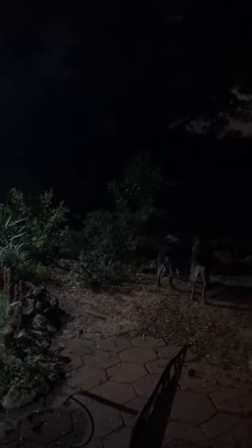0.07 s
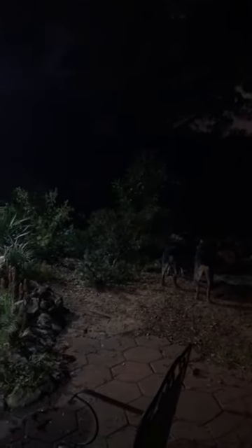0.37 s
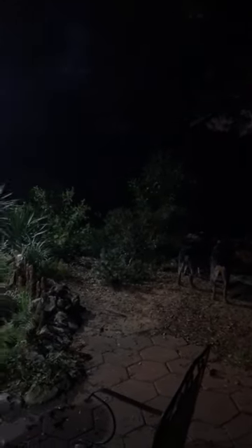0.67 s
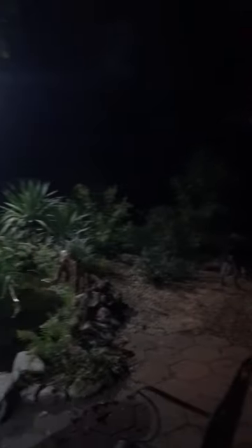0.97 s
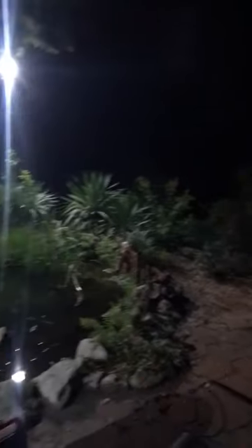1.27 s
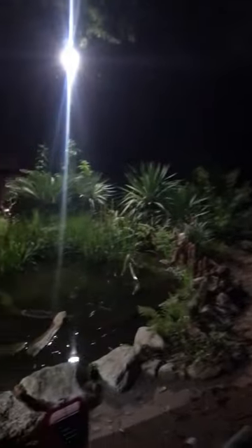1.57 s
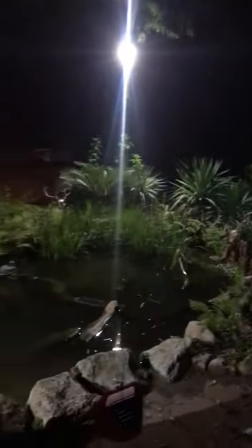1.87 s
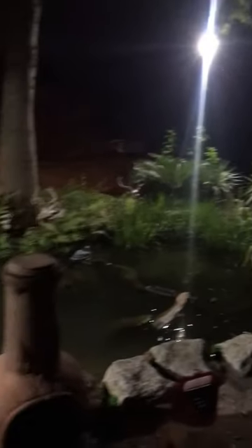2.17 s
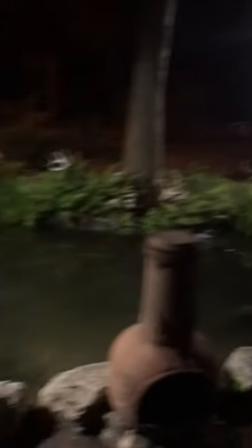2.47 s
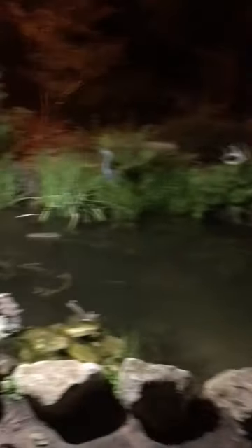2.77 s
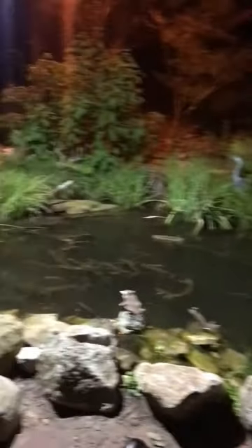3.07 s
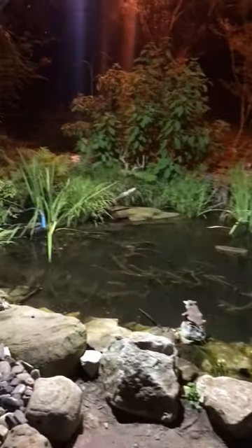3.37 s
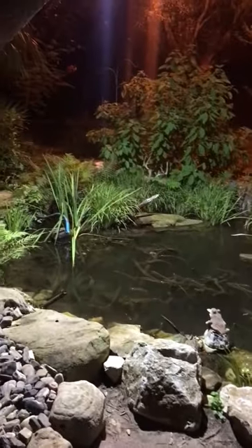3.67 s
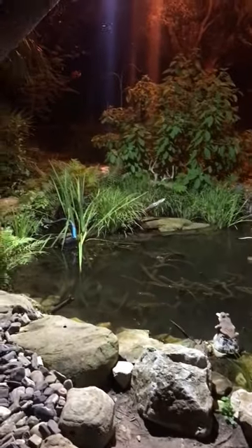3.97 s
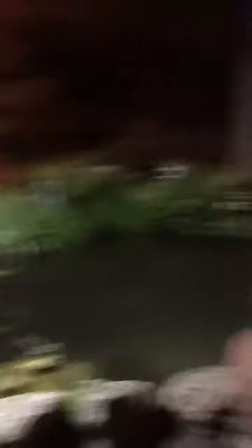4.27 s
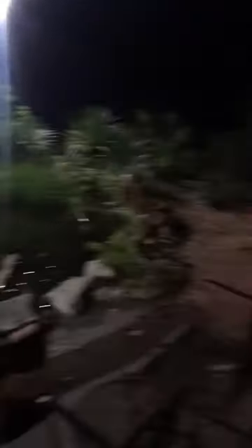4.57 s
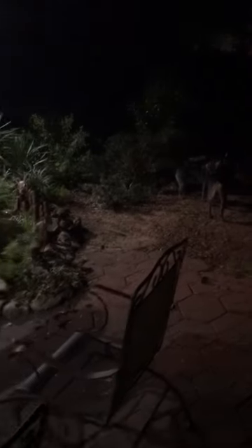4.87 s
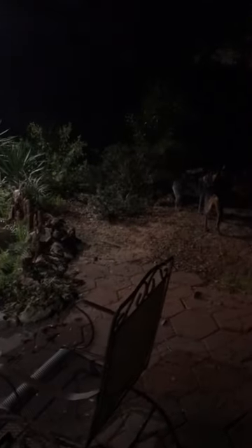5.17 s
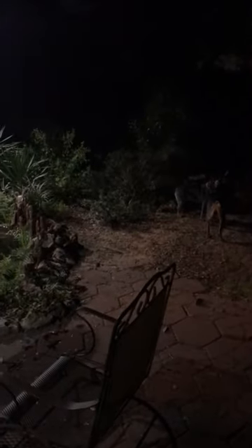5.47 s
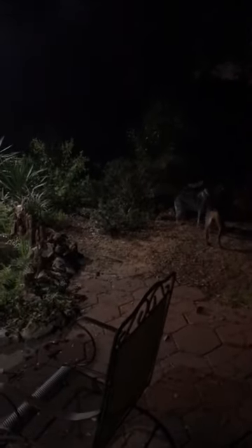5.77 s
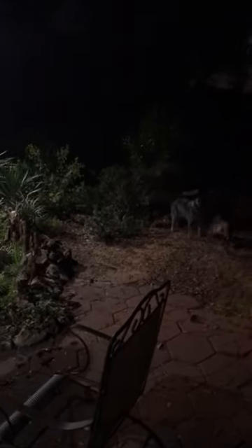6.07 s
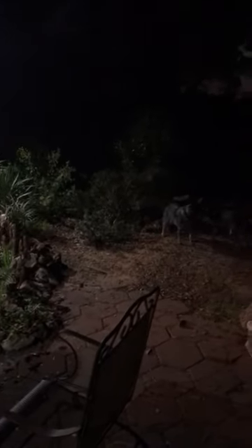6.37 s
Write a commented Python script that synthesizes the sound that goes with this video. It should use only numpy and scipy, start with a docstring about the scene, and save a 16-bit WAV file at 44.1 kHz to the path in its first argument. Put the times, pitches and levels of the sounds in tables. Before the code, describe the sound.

Dogs bark across a garden at night from the very start, about ten quick, shrill barks in the first two seconds. Each arches up and down in pitch and breaks into a rasp, with soft whines in between. From about 2.1 to 2.8 seconds one dog holds a short, almost pure howl that begins hoarse. Barks continue from 2.5 to 4 seconds, some cracking into a screech, with a weaker one at 4.4. A lull follows with faint dry rustles near 4.7 and 5 seconds. High yelps come between 5.3 and 6 seconds, then one sharp, yelping bark at 6.4. The house and fence return a faint echo. Throughout, a high insect buzz, a low pond pump hum, trickling water and night air sit very quietly behind the dogs. The hand-held microphone takes two soft, low bumps at about 2.6 and 4.3 seconds.

```python
"""Dogs in a back garden at night

Quick, shrill barks carry across the garden, each an arch of pitch that breaks into half-tones and rasp.
One dog holds a short pure howl, and the last barks turn into yelps. Fence and house answer faintly.
Behind them lie a katydid's high buzz, a pond pump's hum, trickling water and faint rustles.
The microphone is hand-held and gets bumped twice."""
import sys
import numpy as np
from scipy import signal
from scipy.fft import rfft, irfft, next_fast_len
from scipy.io import wavfile
from scipy.ndimage import uniform_filter1d, minimum_filter1d

SR = 44100
rng = np.random.default_rng(int(sys.argv[2]) if len(sys.argv) > 2 else 0)


def int16_out(signal):
    """Quantize to a 16-bit WAV file."""
    q = np.round(np.clip(np.atleast_2d(signal).T, -1, 1) * 32767)
    wavfile.write(sys.argv[1], SR, q.astype(np.int16))


N = 287532
TIME = np.arange(N) / SR


def barks_and_yelps(steady_jitter=0.0082, rough_jitter=0.035, shimmer=0.22, beat_hz=68):
    """Vocal folds swing near 1 kHz; driven hard, they double their period, then turn chaotic."""
    # rasp of the torn air stream: frequency_hz, gain_db
    rasp_colour = [(250, -38.5), (450, -70), (600, -1.5), (1150, 11.5), (1700, 11), (2300, 2), (2800, 10),
                   (3300, -14), (3900, -11.5), (4800, -45), (8000, -67.5)]
    # the mouth's upper resonances, reached when the folds snap shut hard: frequency_hz, gain_db
    shrill_colour = [(2800, -26.5), (4100, 1.5), (5000, -9.5), (6200, 1.5), (7800, -3.5), (9300, 2),
                     (11500, 0), (14000, -17.5), (16000, -35)]
    out = np.zeros(N)
    wobble, flutter = drift(360), drift(320)
    turbulence, hiss = noise(rasp_colour), noise(shrill_colour)
    slip = 2 * np.pi * np.cumsum(beat_hz * (1 + 0.35 * drift(20.56))) / SR
    for i, gate, pitch, tone_db, parts_db in [*bark_shapes(), *yelp_shapes()]:
        overtone_db, half_db, rasp_db, shrill_db = np.array(parts_db) - tone_db   # against the tone
        chaos = np.clip(from_db(rasp_db), 0, 1)
        pitch = uniform_filter1d(pitch, size=200, mode="nearest")
        # the rougher the voice, the more its cycles differ in length and strength
        jitter = (steady_jitter + rough_jitter * chaos) * wobble[i]
        strength = (1 + shimmer * chaos * flutter[i]) / np.hypot(1, shimmer * chaos)
        phase = 2 * np.pi * np.cumsum(pitch * (1 + jitter)) / SR
        # the two folds slip out of step and beat against each other
        beating = 0.8 * np.sqrt(chaos) * np.tanh(4 * chaos) * np.sin(phase + slip[i])
        tone = strength * (np.sin(phase) + beating + overtones(pitch, phase, overtone_db, half_db))
        # air is torn through the folds in puffs
        puffing = 1 + 0.1 * np.cos(phase / 2)
        puffs = from_db(rasp_db - 6) * turbulence[i] * puffing
        # uneven cycles blur the highest harmonics most
        ragged = phase + 0.1 * np.sqrt(chaos) * flutter[i]
        doubling = np.minimum(from_db(half_db - overtone_db), 1)
        highs = 0
        for k in np.arange(3, 12, 0.5):
            gain = from_db(at_hz(shrill_colour, k * pitch)) * (doubling if k % 1 else 1)
            highs += gain * np.sin(k * ragged)
        # they dissolve into hiss where the rasp outweighs the overtone
        airy = np.clip(0.03 + 1 / (1 + from_db(overtone_db - rasp_db + 3) ** 2), 0, 1)
        edge = np.sqrt(1 - airy) * rms_one(highs) + np.sqrt(airy) * hiss[i] * puffing
        out[i] += gate * from_db(tone_db) * (tone + puffs + from_db(shrill_db - 6) * edge)
    return out


def overtones(pitch, phase, overtone_db, half_db):
    """Harmonics of the folds, and half-tones between them as strong and weak cycles alternate."""
    # resonances of throat and open mouth: frequency_hz, gain_db
    throat = [(300, -40), (460, -32.5), (570, -5.5), (1100, 3.5), (1900, -2.5), (2800, -6), (3300, -6.5),
              (3900, -51), (4800, -46.5), (8000, -78.5)]
    out = from_db(overtone_db) * np.sin(2 * phase)
    for k in range(3, 7):
        colour_db = at_hz(throat, k * pitch) - 1 - 11 * np.log2(k / 2)
        out += from_db(overtone_db + colour_db) * np.sin(k * phase)
    for k in np.arange(5) + 0.5:
        colour_db = at_hz(throat, k * pitch) + 1 - abs(np.log2(k / 1.5))
        out += from_db(half_db + colour_db) * np.sin(k * phase)
    return out


def bark_shapes(break_s=0.0035, closing_s=0.023, sag_hz_per_s=650, fade_db_per_s=163.5, fall_ratio=0.455):
    """Each bark rises, stays harsh a moment, breaks into a clear note and falls as the mouth closes."""
    # barks: start_s, rise_s, harsh_s, clear_s, fall_s, first_hz, top_hz, clear_hz, harsh_db, clear_db,
    # harsh_overtone_db, clear_overtone_db, half_db, rasp_db, shrill_db, roughness_lost_db
    barks = [(-0.06, 0.029, 0.034, 0.018, 0.25, 860.0, 1262.0, 1152, -13, -11.5, -24, -36.0, -40.5, -20.5, -31, 10.5),
             (0.127, 0.034, 0.045, 0.055, 0.12, 980, 1158, 1083, -12.5, -6, -12.5, -22, -17, -18.0, -29, 6.5),
             (0.395, 0.034, 0.033, 0.068, 0.18, 766, 1323, 1050.0, -7.5, -0.5, -17.5, -37.5, -28.5, -10.5, -27, 9.5),
             (0.578, 0.041, 0.044, 0.053, 0.1, 864, 1131, 1053, -8.0, -4.5, -17.5, -25.5, -21.5, -18.5, -32, 5.5),
             (0.937, 0.04, 0.027, 0.045, 0.12, 653, 1285, 1042, -5, -0.5, -13.5, -37, -27, -13, -34, 5.5),
             (1.074, 0.031, 0.075, 0.026, 0.095, 1007, 1127, 1070, -13.5, -6.0, -19.5, -24.5, -31, -18, -34, 3.5),
             (1.273, 0.048, 0.043, 0.097, 0.093, 1210, 1360, 1061, -10.0, -2.0, -16.5, -38.5, -27.5, -22.5, -34.5, 3.5),
             (1.599, 0.033, 0.054, 0.037, 0.065, 902, 1159, 1080, -4.5, -3.5, -13, -26.5, -18.0, -15.5, -32, 4.5),
             (1.815, 0.044, 0.024, 0.064, 0.12, 699, 1127, 1007, -4.5, -1.5, -21, -51, -32.5, -16.5, -36.0, 7.5),
             (1.965, 0.042, 0.031, 0.064, 0.12, 769, 1124, 1079, -11.5, -5, -18.0, -29, -28.5, -27, -38.0, 0.5),
             (2.455, 0.031, 0.031, 0.042, 0.096, 1440, 1174, 1157, -10.5, -5.5, -20.5, -29.5, -46.5, -18, -34.0, 0),
             (2.873, 0.042, 0.033, 0.031, 0.055, 996, 1277, 1345, -7, -5.5, -12.5, -21, -24.5, -19.5, -27, 0.5),
             (3.068, 0.04, 0.044, 0.076, 0.059, 897, 1315, 1106, -9.5, -6, -28, -38, -45, -15, -33.5, 7.5),
             (3.376, 0.036, 0.058, 0.013, 0.055, 923, 1199, 1341, -9.5, -10, -12.0, -22, -21, -21, -26.5, 5),
             (3.65, 0.027, 0.036, 0.06, 0.066, 765, 1367, 1189, -8, -7, -19.5, -69, -29, -16.0, -36, -1),
             (3.848, 0.025, 0.063, 0.033, 0.081, 1252, 1515.0, 1312, -11.5, -7.5, -29.5, -30, -55, -27.5, -40.5, -4),
             (4.362, 0.056, 0.026, 0.0031, 0.071, 890.0, 1099, 1017, -22.5, -16, -15, -22.0, -30.0, -30.5, -40.5, -3.5),
             (6.375, 0.043, 0.0027, 0.03, 0.048, 1100.0, 1268, 1600, -8, 5, -14, -23.5, -31.5, -24.5, -24.5, -1)]
    # level offsets of each part of the voice by stage: onset_db, harsh_db, closing_db, fall_db
    tone_stages = (-25.5, -2, -14, -17)
    overtone_stages = (-15.5, -14, 0, -15)
    half_stages = (-33, -0.5, -23, 4)
    rasp_stages = (-13, -2, -4.5, -11)
    shrill_stages = (-22, -2.5, -5.5, -11)
    for row in barks:
        start, rise, harsh, clear, fall, first_hz, top_hz, clear_hz, harsh_db, clear_db = row[:10]
        harsh_overtone_db, clear_overtone_db, half_db, rasp_db, shrill_db, roughness_lost_db = row[10:]
        breaks, closes = rise + harsh, rise + harsh + clear
        i, gate = sounding(start, start + closes + fall)
        t = TIME[i] - start
        opened, strained, cleared = ramp(t, 0, rise), ramp(t, rise, harsh), ramp(t, breaks, break_s)
        closed, fallen = ramp(t, closes, closing_s), ramp(t, closes, fall)
        held_s = clear * ramp(t, breaks, clear)
        pitch = first_hz + (top_hz - first_hz) * opened ** 2
        pitch += (clear_hz - top_hz) * strained - sag_hz_per_s * held_s
        pitch *= fall_ratio ** fallen
        stages = np.transpose([1 - opened, strained * (1 - cleared), closed, fallen])
        falter_db = 8 * np.exp(-((t - breaks) / break_s) ** 2)   # a dip as the register breaks
        tone = harsh_db + (clear_db - harsh_db) * cleared + stages @ tone_stages
        tone -= fade_db_per_s * held_s + falter_db
        overtone = harsh_overtone_db + (clear_overtone_db - harsh_overtone_db) * cleared
        overtone += stages @ overtone_stages
        # the rough parts change at the break and fade through the clear note
        rough_stages = np.transpose([1 - opened, strained, closed, fallen])
        smoothing_db = roughness_lost_db * cleared + 60 * held_s
        half = half_db + rough_stages @ half_stages - smoothing_db
        rasp = rasp_db + rough_stages @ rasp_stages - smoothing_db
        shrill = shrill_db + rough_stages @ shrill_stages - smoothing_db
        yield i, gate, pitch, tone, [overtone, half, rasp, shrill]


def yelp_shapes(ends_db=-19.5, clean_db=-21.5, half_db=-18.5, turn_s=0.0074, fall_ratio=0.36):
    """Each yelp is a higher, cleaner arch that frays a moment: a rounded climb, a hold, a steep slide."""
    # yelps: start_s, attack_s, rise_s, hold_s, fall_s, fray_after_s, fray_for_s, first_hz, top_hz,
    # tone_db, overtone_db, rasp_db, shrill_db
    yelps = [ (5.343, 0.027, .05, 0.014, 0.069, 0.094, 0.03, 1372, 1699, -8.5, -22.5, -16, -28),
             (5.667, 0.0041, 0.047, 0.0058, 0.044, 0.061, .025, 1413, 1670, -11, -28, -24, -36.5),
             (5.755, 0.0051, .045, 0.0095, .048, 0.0056, 0.0091, 1417, 1680, -31, -38, -29, -48),
             (5.844, 0.023, 0.04, 0.06, 0.056, 0.052, 0.041, 1183, 1650, -9, -28.5, -13.5, -30.5), ]
    for start, attack, rise, hold, fall, fray_after, fray_for, first_hz, top_hz, *levels in yelps:
        tone_db, overtone_db, rasp_db, shrill_db = levels
        i, gate = sounding(start, start + rise + hold + fall)
        t = TIME[i] - start
        fallen = ramp(t, rise + hold, fall)
        pitch = first_hz + (top_hz - first_hz) * np.sin(np.pi / 2 * ramp(t, 0, rise))
        pitch *= fall_ratio ** (fallen ** 1.4)
        effort_db = ends_db * (1 - ramp(t, 0, attack) + fallen ** 2)
        frayed = ramp(t, fray_after - turn_s, turn_s) - ramp(t, fray_after + fray_for, turn_s)
        rasp = rasp_db + clean_db * (1 - frayed)
        parts_db = [db + effort_db for db in (overtone_db, rasp + half_db, rasp, shrill_db)]
        yield i, gate, pitch, tone_db + effort_db, parts_db


def howl(jitter=0.0044, clears_s=2.296):
    """One dog holds an almost pure note that starts hoarse."""
    # course of the howl: time_s, pitch_hz, level_db
    course = [(2.13, 740, -28.5), (2.218, 778, -22.5), (2.3, 881, -14.5), (2.438, 826.5, -12.5),
              (2.5, 789, -25), (2.6, 823, -17), (2.708, 877, -8), (2.76, 860, -14.5), (2.799, 852, -22.5),
              (2.85, 816, -27.5)]
    out = np.zeros(N)
    i, gate = sounding(course[0][0], course[-1][0])
    pitch, level_db = along(course, TIME[i])
    phase = 2 * np.pi * np.cumsum(pitch * (1 + jitter * drift(49)[i])) / SR
    tone = np.sin(phase) + from_db(-43) * np.sin(2 * phase) + from_db(-42) * np.sin(3 * phase)
    hoarse = noise([(400, -20), (700, 0.5), (1400, 1), (2000, -28.5), (3000, -28), (5000, -85)])[i]
    hoarse *= from_db(-31) / (1 + np.exp((TIME[i] - clears_s) / 0.0095))
    out[i] = gate * (from_db(level_db) * tone + hoarse)
    return out


def voice_cracks():
    """The folds jump to a higher pitch and swing there with unsteady strength and phase."""
    # cracks into a harsh upper register: time_s, half_length_s, centre_hz, width_hz, level_db
    cracks = [(0.42, 0.013, 3100, 162, -17.5), (3.702, 0.03, 1792, 89, -16),
              (3.927, 0.057, 1387, 95, -18.5), (5.912, 0.032, 1973, 242.3, -13.5),
              (6.417, 0.0084, 2575, 194.5, -11.5)]
    out = np.zeros(N)
    for time_s, half_length_s, centre_hz, width_hz, level_db in cracks:
        i, shape = swell(time_s, half_length_s)
        phase = 2 * np.pi * centre_hz * TIME[i]
        unsteady = drift(width_hz)
        screech = unsteady[i] * np.sin(phase) + unsteady[-i] * np.cos(phase)
        out[i] += from_db(level_db) * np.sqrt(shape) * rms_one(screech)
    return out


def whines():
    """Short soft glides, between and under the barks."""
    # glides: time_s, half_length_s, pitch_hz, fall_hz_per_s, level_db
    glides = [(0.651, 0.019, 660, -8, -15), (0.863, 0.019, 930, 5002, -32.5),
              (0.881, 0.043, 433, 1511.5, -38), (1.143, 0.025, 663, -14, -18.5),
              (1.517, 0.062, 780, 1006.5, -40.5), (1.79, 0.042, 503, 800, -36.5),
              (2.524, 0.025, 589, 5, -24.5), (3.043, 0.022, 590, 2500, -22),
              (5.10, 0.048, 1333, 1.5, -55.5), (5.80, 0.041, 887, -1200, -36),
              (6.305, 0.093, 585, -800, -52.5)]
    out = np.zeros(N)
    for time_s, half_length_s, pitch_hz, fall_hz_per_s, level_db in glides:
        i, shape = swell(time_s, half_length_s)
        t = TIME[i] - time_s
        out[i] += from_db(level_db) * shape * np.sin(2 * np.pi * (pitch_hz - fall_hz_per_s * t / 2) * t)
    return out


def garden(dogs, echo_cut_hz=6000, build_s=0.0027):
    """A few echoes reach the microphone, then a thin tail scattered by shrubs and walls."""
    # echoes from paving, house and fence: delay_s, level_db
    reflections = [(0.0136, -13.5), (0.029, -25.5), (0.062, -24.5), (0.095, -22)]
    # the garden's reverberation: frequency_hz, t60_s
    decay_times = [(500, 0.11), (1100, 1), (1550, 1), (2300, 0.76), (3500, 0.14), (10000, 0.16)]
    # the dogs face away, so their treble returns mostly scattered: frequency_hz, gain_db
    scatter = [(300, -9), (600, -15.5), (1200, -25.5), (2700, -16), (5500, -2.5), (12000, -13)]
    dull = filtered(dogs, 1, echo_cut_hz)
    echoes = sum(from_db(db) * np.interp(TIME - delay, TIME, dull, left=0) for delay, db in reflections)
    t, tail = TIME[:SR], 0
    edges_hz = np.geomspace(250, 16000, 11)
    for low, high in zip(edges_hz, edges_hz[1:]):
        hz = np.sqrt(low * high)
        decay = np.exp(-np.log(1000) * t / at_hz(decay_times, hz)) * (1 - np.exp(-t / build_s))
        scattered = rng.standard_normal(SR) * decay / np.sqrt(np.sum(decay ** 2))
        tail += from_db(at_hz(scatter, hz)) * filtered(scattered, 3, [low, high], "band")
    return echoes + signal.fftconvolve(dogs, tail)[:N]


def microphone_bumps():
    """Soft low thuds of the hand on the microphone."""
    # bumps: time_s, level_db, spread_s
    bumps = [(2.646, -39.5, 0.009), (4.3, -34.5, 0.046)]
    rumble = noise([(15, -35), (35, -3.5), (75, 2.5), (120, -10.5), (220, -28), (500, -55), (2000, -68)])
    return rumble * sum(from_db(db) * np.exp(-0.5 * ((TIME - s) / spread) ** 2) for s, db, spread in bumps)


def katydid(strokes_per_s=62.7, width_hz=300, sweep_hz=220, chorus=0.77):
    """Each scrape rings the wings at a slightly rising pitch, over a far steady chorus."""
    # course of the buzz: time_s, centre_hz, level_db
    buzz = [(0, 9080, -57), (1.3, 8800, -52.5), (1.7, 8780, -51), (4.15, 9080, -52), (4.6, 9370, -54.5),
            (6.5, 9100, -54)]
    centre_hz, level_db = along(buzz, TIME)
    stroke = (np.cumsum(strokes_per_s * (1 + 0.003 * drift(3))) / SR) % 1
    scrape = np.sin(np.pi * stroke) ** 4
    band = filtered(rng.standard_normal(N), 2, width_hz)
    wing = np.sin(2 * np.pi * np.cumsum(centre_hz + sweep_hz * (2 * stroke - 1)) / SR)
    return from_db(level_db) * rms_one(band * wing * (chorus + scrape))


def pump(waver=0.18, wander_hz=0.87):
    """The pond pump hums low, with faint whining lines that waver a little."""
    # lines of the hum: pitch_hz, level_db
    hum = [(60, -66), (71, -61), (107.7, -66), (215.3, -70), (570.6, -74), (780.6, -74), (1550, -68),
           (3523, -71)]
    out = np.zeros(N)
    for pitch_hz, level_db in hum:
        amplitude = from_db(level_db) * np.sqrt(2) * (1 + waver * drift(9.6))
        out += amplitude * np.sin(2 * np.pi * np.cumsum(pitch_hz + wander_hz * drift(5.8)) / SR)
    return out


def trickle(bubbles_per_s=70, level_db=-62, ring_cycles=22):
    """Small bubbles in the pond, each ringing briefly at its own pitch."""
    out = np.zeros(N)
    pitches = np.geomspace(600, 5000, 14)
    for hz in pitches:
        born = rng.random(N) < bubbles_per_s / len(pitches) / SR
        sizes = rng.rayleigh(1, N)
        decay, step = np.exp(-np.log(1000) * hz / ring_cycles / SR), 2 * np.pi * hz / SR
        resonator = [1, -2 * decay * np.cos(step), decay ** 2]
        out += signal.lfilter([0, np.sin(step)], resonator, born * sizes + 1e-18)
    return from_db(level_db) * rms_one(out)


def rustles():
    """Faint dry brushes of grit and leaves on the ground."""
    # brushes: time_s, half_length_s, level_db
    brushes = [(4.718, 0.033, -51), (4.975, 0.058, -50.5), (5.232, 0.017, -74.5), (6.24, 0.012, -50)]
    out = np.zeros(N)
    grit = noise([(150, -26), (900, 6.5), (2500, 4), (6000, -3), (12000, -10), (16000, -28)])
    for time_s, half_length_s, level_db in brushes:
        i, shape = swell(time_s, half_length_s)
        out[i] += from_db(level_db) * shape * grit[i]
    return out


def night_air(level_db=-52.5):
    """The steady wash of night air and trickling water behind everything."""
    # colour of the wash: frequency_hz, gain_db
    air = [(25, -6.5), (65, 5.5), (130, -1), (350, -5.5), (1300, -5.5), (2000, -11), (3000, -11.5),
           (4550, -9.5), (5300, -17.5), (7000, -10), (7800, -13), (11500, -7), (13500, -13.5), (16000, -42)]
    return from_db(level_db) * noise(air)


def from_db(db):
    """Decibels to gain."""
    return 10 ** (np.asarray(db) / 20)


def rms_one(x):
    """Scale to unit rms."""
    return x / np.sqrt(np.mean(x ** 2) + 1e-20)


def filtered(x, order, hz, kind="low"):
    """A low-, high- or band-pass filter with a flat passband."""
    return signal.sosfilt(signal.butter(order, hz, kind, fs=SR, output="sos"), x)


def along(rows, t):
    """Each column of a curve at times t."""
    times, *columns = np.transpose(rows)
    return [np.interp(t, times, column) for column in columns]


def at_hz(points, hz):
    """A spectrum read on a log-frequency axis."""
    frequencies, values = np.transpose(points)
    return np.interp(np.log(hz + 1e-3), np.log(frequencies), values)


def noise(spectrum):
    """Steady noise of rms 1, coloured by rows of frequency_hz, gain_db."""
    size = next_fast_len(N)
    gain = from_db(at_hz(spectrum, np.arange(size // 2 + 1) * SR / size))
    return rms_one(irfft(rfft(rng.standard_normal(size)) * gain, size)[:N])


def drift(rate_hz):
    """Smooth random wander of spread 1."""
    return rms_one(filtered(rng.standard_normal(N + SR), 3, rate_hz)[SR:])


def ramp(t, start_s, length_s):
    """From 0 to 1 over a stage."""
    return np.clip((t - start_s) / max(length_s, 1e-3), 0, 1)


def sounding(start, end, attack_s=0.0035, release_s=0.0072):
    """Sample indices of a call and a gate with soft ends."""
    i = np.flatnonzero((TIME >= start) & (TIME <= end))
    return i, np.clip(np.minimum((TIME[i] - start) / attack_s, (end - TIME[i]) / release_s), 0, 1)


def swell(time_s, half_length_s):
    """Sample indices around a moment and a smooth rise and fall over them."""
    i = np.flatnonzero(abs(TIME - time_s) < half_length_s)
    return i, np.cos(np.pi / 2 * (TIME[i] - time_s) / half_length_s) ** 2


def scene(mouth_cut_hz=430):
    """Dogs across the garden and their echoes over the night background, on one microphone."""
    voices = barks_and_yelps() + voice_cracks() + howl() + whines()
    dogs = filtered(voices, 4, mouth_cut_hz, "high")   # a small mouth radiates little bass
    night = night_air() + katydid() + pump() + trickle() + rustles()
    return (dogs + garden(dogs) + night + microphone_bumps())[None]


def record(dry, ceiling=1.0, cutoff_hz=15700):
    """The recorder's fast limiter turns down peaks above the ceiling; the top treble is cut."""
    allowed = ceiling / np.maximum(abs(dry), ceiling)
    gain = uniform_filter1d(minimum_filter1d(allowed, size=200), size=200)
    return signal.sosfilt(signal.ellip(10, 0.1, 80, cutoff_hz, fs=SR, output="sos"), dry * gain)


dry = scene()
out = record(dry)
int16_out(out)
```